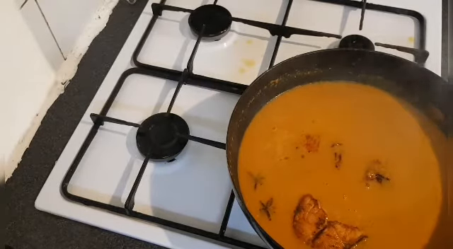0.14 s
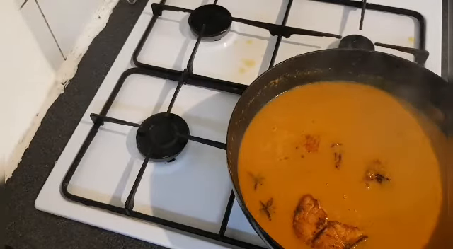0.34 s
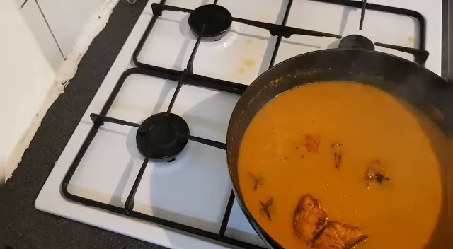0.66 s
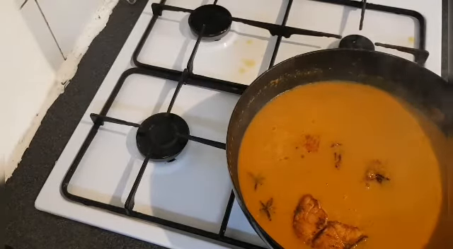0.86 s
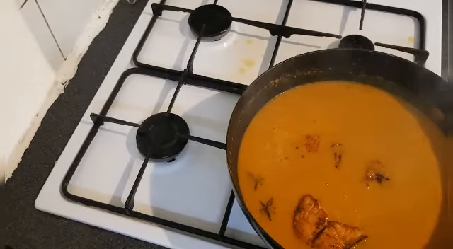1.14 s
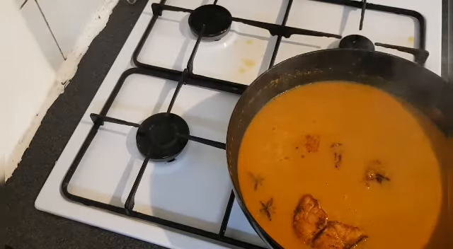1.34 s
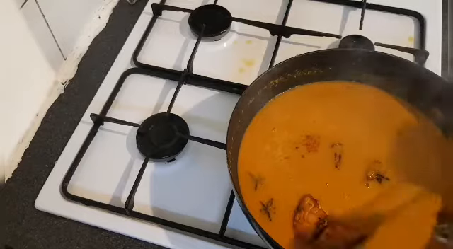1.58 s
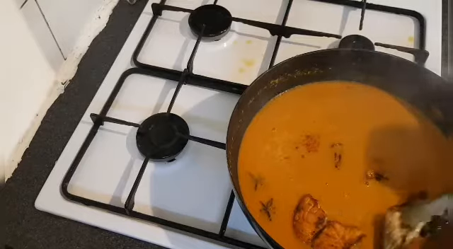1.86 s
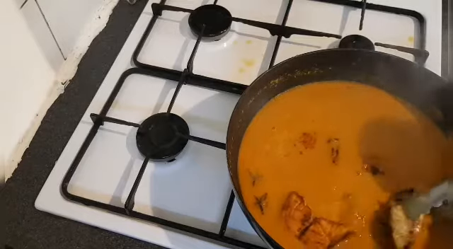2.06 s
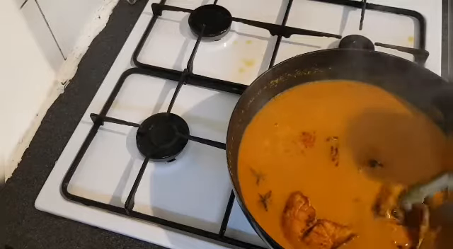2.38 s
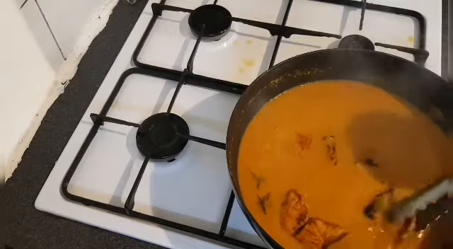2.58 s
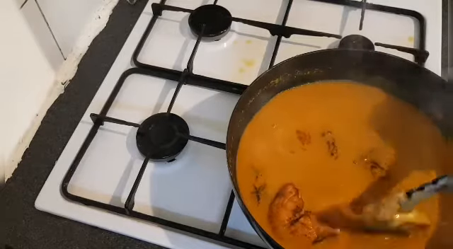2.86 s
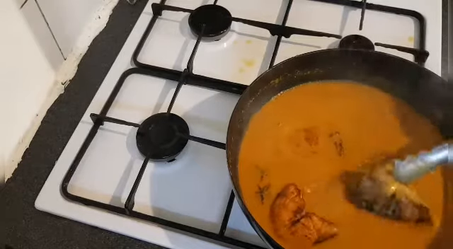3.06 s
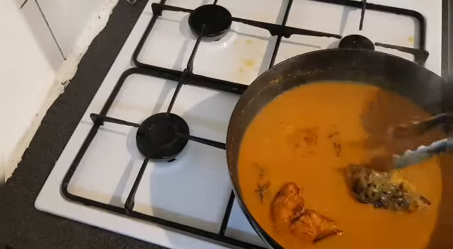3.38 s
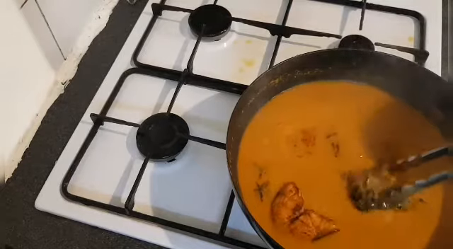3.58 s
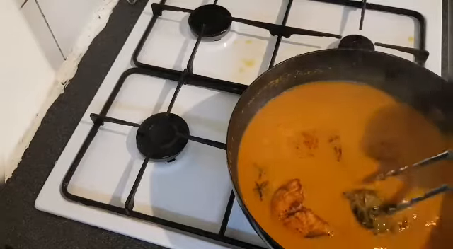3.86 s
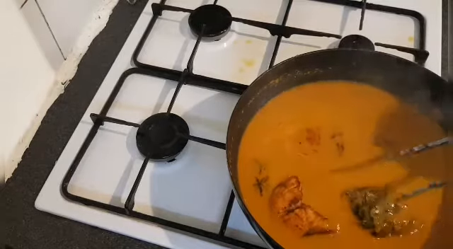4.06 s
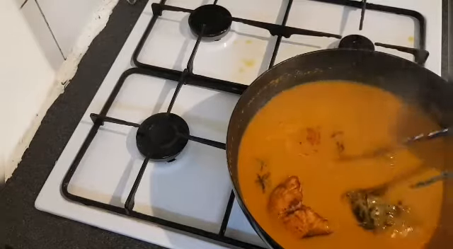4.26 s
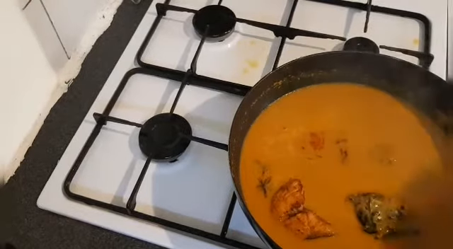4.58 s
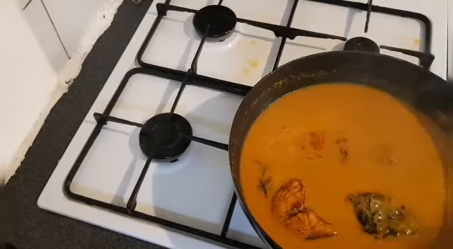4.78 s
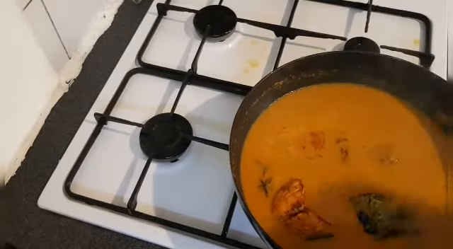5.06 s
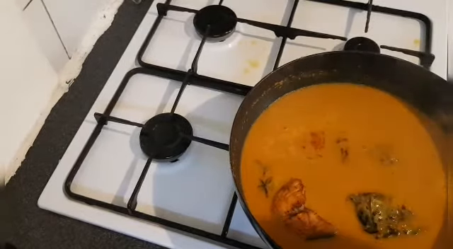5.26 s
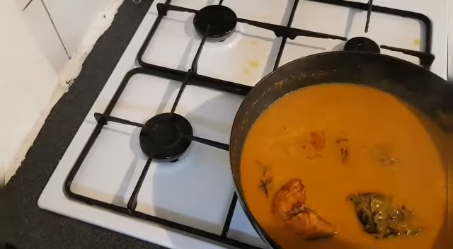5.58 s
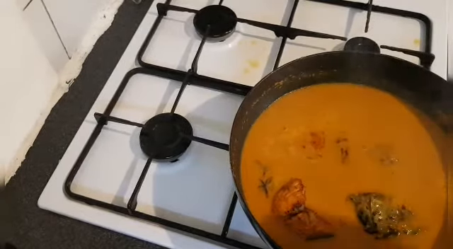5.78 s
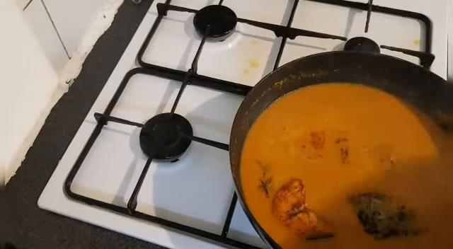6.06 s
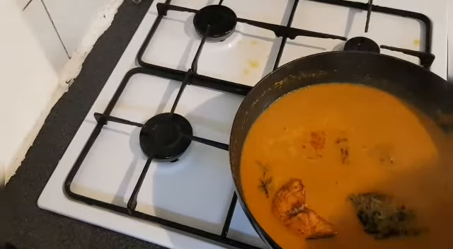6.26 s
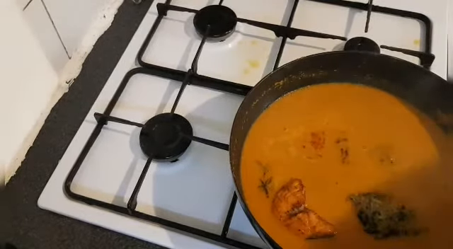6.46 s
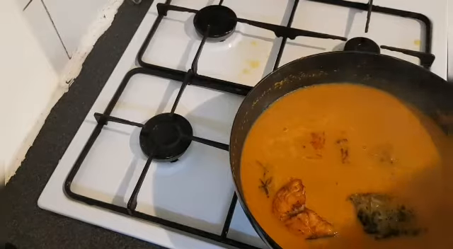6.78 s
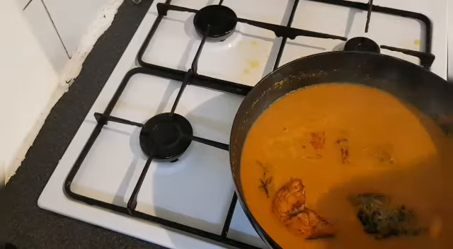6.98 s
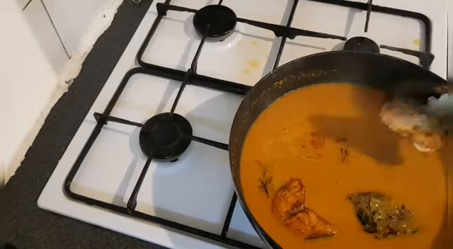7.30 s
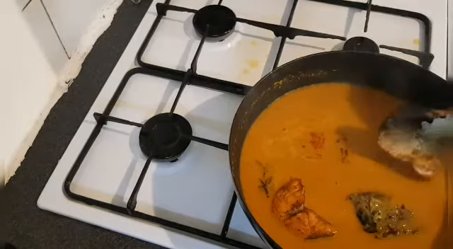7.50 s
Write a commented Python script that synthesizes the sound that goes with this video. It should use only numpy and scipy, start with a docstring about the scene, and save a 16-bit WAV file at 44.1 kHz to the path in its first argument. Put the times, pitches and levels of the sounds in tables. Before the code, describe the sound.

Steady flame rumble, gas hiss and faint electrical hum lie under sparse, crisp metal sounds. Thin tongs click and bounce, their arms knock a heavy sauce-damped pan, giving short dull rings and a low thump. Tiny bubbles spit and a few thick gulps blurt as sauce moves. Close microphones in a small kitchen catch a brief bright reflection after each contact.

```python
"""Tongs in a simmering curry pan.

Fish is turned with steel tongs in a pan of curry on a gas hob in a small kitchen. The burner rumbles and
hisses throughout (shaped noise) over a mains hum (sines). Tong tips tick and arms clack on the rim (noise
bursts with decaying modes), ringing the sauce-damped pan, which thumps on its grate. Thick sauce plops
and simmers (short rising sines with noise); a faint high rattle of the tongs is made the same way."""
import sys
import numpy as np
from scipy import signal
from scipy.fft import rfft, irfft, next_fast_len
from scipy.io import wavfile

SR = 44100
rng = np.random.default_rng(int(sys.argv[2]) if len(sys.argv) > 2 else 0)


def store_pcm(level_fs):
    """Save levels as 16-bit WAV."""
    pcm = np.round(np.clip(level_fs, -1, 1) * 32767).astype(np.int16)
    wavfile.write(sys.argv[1], SR, np.atleast_2d(pcm).T)


N = 336483
T = np.arange(int(0.7 * SR)) / SR  # time axis of every short sound, s


def undb(db):
    """Convert decibels to gain."""
    return 10 ** (np.asarray(db) / 20)


def pan(left_minus_right_db):
    """Gains of the two channels, the level difference split evenly between them."""
    return undb(np.array([[left_minus_right_db], [-left_minus_right_db]]) / 2)


def level(x, rms_db):
    """Set the rms level of a steady sound."""
    return x * undb(rms_db) / np.sqrt(np.mean(x ** 2))


def blow_level(x, db):
    """Set each channel's level of a short sound, as if its energy were spread over 10 ms."""
    rms = np.sqrt(np.sum(x ** 2, axis=-1, keepdims=True) / (SR / 100))
    return x * undb(db) / rms


def colour(points):
    """Gain as a function of frequency, interpolated in dB over log frequency."""
    hz, db = np.transpose(points)
    return lambda f: undb(np.interp(np.log(f), np.log(hz), db))


def decay(t60_s):
    """Exponential fall of 60 dB in t60_s."""
    return np.exp(-np.log(1000) * T / t60_s)


def noise(size, gain, apart_hz=1100):
    """Coloured noise at two microphone ports: alike in the bass, unrelated in the treble."""
    length = next_fast_len(size)
    f = np.fft.rfftfreq(length, 1 / SR) + 1
    mid, side = rfft(rng.standard_normal((2, length)))
    side = side * np.minimum(f / apart_hz, 1)
    ports = np.array([mid + side, mid - side])
    return irfft(ports * gain(f), length)[:, :size]


def walk(rate_hz):
    """Slow random wander with a spread near 1: random points joined by lines."""
    steps = np.arange(N) / SR * rate_hz
    return np.interp(steps, np.arange(1000), rng.standard_normal(1000))


def ring(modes, tilt_db_per_octave=0, apart_hz=1500):
    """Decaying modes, slightly detuned; the higher ones reach the two ports out of step."""
    out = 0
    for hz, db, t60_s in modes:
        spread = rng.uniform(-np.pi, np.pi) * min(hz / apart_hz, 1)
        phase = spread / 2 * np.array([[1], [-1]])
        detuned_hz = hz * (1 + 0.0037 * rng.standard_normal())
        gain = undb(db + tilt_db_per_octave * np.log2(hz))
        out = out + gain * decay(t60_s) * np.sin(2 * np.pi * detuned_hz * T + phase)
    return out


def crack(gain, rise_s, fall_s, chatter_db, chatter_s, room_db, t60_s, snap_hz=3500):
    """A brief bright noise burst, a slower chatter, then its wash from tiles and walls."""
    burst = noise(len(T), lambda f: gain(f) * f / np.hypot(f, snap_hz))
    burst = burst * (1 - np.exp(-T / rise_s)) * np.exp(-T / fall_s)
    chatter = noise(len(T), gain) * (1 - np.exp(-T / fall_s)) * np.exp(-T / chatter_s)
    wash = noise(len(T), gain) * (1 - np.exp(-T / chatter_s)) * decay(t60_s)
    return blow_level(burst, 0) + blow_level(chatter, chatter_db) + blow_level(wash, room_db)


def kitchen(x, wet_db, t60_s, onset_s=0.0015):
    """Direct sound plus dense reflections of hob, tiles and walls, drawn anew for each sound."""
    tail = noise(len(T), np.ones_like, apart_hz=320)
    tail = tail * decay(t60_s) * (1 - np.exp(-(T / onset_s) ** 2))
    tail = tail / np.sqrt(np.sum(tail ** 2, axis=1, keepdims=True))
    return x + undb(wet_db) * signal.fftconvolve(x, tail, axes=1)[:, :len(T)]


def add(out, start_s, x):
    """Mix a short sound in at start_s."""
    start = int(start_s * SR)
    out[:, start:start + len(T)] += x[:, :N - start]


def burner():
    """The flame flutters low down; the gas jet hisses and sounds the resonances of the burner tube."""
    # rumble of the flame, relative spectrum: hz, level_db
    flame_colour = [(20, -21), (45, -6), (70, -3.5), (105, 5), (135, -6), (205, -5.5), (245, -8.5),
                    (320, -4), (400, -13.5), (1000, -20.5), (2000, -33.5), (2800, -61), (16000, -92)]
    # hiss of the gas, relative spectrum: hz, level_db
    gas_colour = [(1000, -19), (2400, 0), (3100, -34), (4800, 9), (6500, 6), (7400, -2.5), (8600, 8),
                  (11000, 7), (13000, 8.5), (14500, 9.5), (16000, -9)]
    # jet and tube resonances, levels before flutter: centre_hz, nominal_width_hz, rms_db, left_minus_right_db
    burner_modes = [(1729, 338, -58, 0.5), (3912, 305, -67.5, 3.5), (5383, 260, -69, 5.5),
                    (6166, 340, -68, 4.5), (9430, 34, -79, 9.5), (9100, 1600, -70, 4),
                    (12100, 380, -64, 2.5)]
    flame = level(noise(N, colour(flame_colour), apart_hz=1110), -48.0)
    flame = flame * undb(1.25 * walk(10))
    gas = level(noise(N, colour(gas_colour)), -63.0)
    for hz, width_hz, db, pan_db in burner_modes:
        resonance = noise(N, lambda f: 1 / (1 + (1.64 * (f - hz) / width_hz) ** 2))
        gas = gas + level(resonance, db) * pan(pan_db)
    return flame + gas * undb(0.39 * walk(27))


def hum():
    """Mains hum: harmonics wavering a little in level and phase."""
    # hum lines, levels before wavering: hz, rms_db
    hum_lines = [(50, -54), (100, -55.5), (300, -60.5)]
    t = np.arange(N) / SR
    out = 0
    for hz, db in hum_lines:
        wavering = undb(db + 1.2 * walk(3))
        out = out + wavering * np.sin(2 * np.pi * hz * t + 0.25 * walk(4))
    return np.sqrt(2) * out  # rms to peak


def tip_contact(db, edge_hz, spot_hz, spot_db=9, spot_width_hz=450, body_db=-23):
    """One touch of the thin steel tips: bright above an edge, favouring one resonance."""
    # contact noise of the tips, relative spectrum: hz, level_db
    tick_colour = [(1800, 16.5), (3000, 0.5), (4500, 2.5), (7000, -10), (9600, 1.5), (11500, -0.5),
                   (13700, -24), (16000, 8)]
    # tip modes, relative levels: hz, level_db, t60_s
    tip_modes = [(4540, -1, 0.073), (5360, 4, 0.051), (7730, 1.5, .1), (8600, 2, 0.052), (9660, 0.5, 0.16),
                 (10400, -14, 0.068), (11000, -28, 0.059), (12500, 8, 0.1), (13700, 7, 0.09),
                 (15100, -16, 0.061)]

    def touch(f):
        return 1 / np.sqrt(1 + (edge_hz / f) ** 8) + undb(body_db) * f / (f + 1000)

    def spot(f):
        return 1 + (undb(spot_db) - 1) / (1 + (2 * (f - spot_hz) / spot_width_hz) ** 2)

    contact = crack(lambda f: colour(tick_colour)(f) * touch(f) * spot(f), rise_s=0.0011, fall_s=0.0011,
                    chatter_db=1.5, chatter_s=0.005, room_db=3.5, t60_s=0.33)
    excited = []
    for hz, mode_db, t60_s in tip_modes:
        drive_db = 20 * np.log10(touch(hz) * spot(hz)) + 4 * rng.standard_normal()
        excited.append((hz, mode_db + drive_db, t60_s))
    tips = kitchen(ring(excited), wet_db=0.5, t60_s=0.2)
    return blow_level(blow_level(contact, 0) + blow_level(tips, -9), db)


def tong_ticks():
    """The springy tips touch and rebound twice, the second rebound after a shorter gap and weaker."""
    # ticks: start_s, level_db, lower_edge_hz, strongest_resonance_hz, first_rebound_after_s,
    # first_rebound_relative_db, left_minus_right_db
    ticks = [(0.2673, -23, 8200, 9550, 0.0061, -4, 0), (1.7928, -27, 7800, 8500, 0.0047, -5, 1),
             (1.8535, -24.5, 6400, 13900, 0.0092, -6, 1), (3.047, -40, 7750, 8450, .006, 3.5, 0),
             (3.089, -29.5, 7960, 13000, 0.0026, 2.5, -3), (3.1046, -27.5, 3530, 4200, 0.0088, 0, 6),
             (4.7508, -28.5, 6900, 10800, 0.0087, -1.5, 0), (4.8302, -27.5, 5700, 13800, .009, -4.5, 2),
             (5.2374, -46, 4500, 9400, .022, -4, 0), (7.2675, -22, 5600, 14000, 0.011, -7, 3),
             (7.3205, -36.5, 5200, 8800, 0.0094, 2, 6)]
    gap_ratio, rebound_loss_db = 0.85, -10
    out = np.zeros((2, N))
    for start_s, db, edge_hz, spot_hz, gap_s, rebound_db, pan_db in ticks:
        touches = [(0, 0), (gap_s, rebound_db),
                   (gap_s * (1 + gap_ratio), rebound_db + rebound_loss_db)]
        for late_s, relative_db in touches:
            touch = tip_contact(db + relative_db, edge_hz, spot_hz)
            add(out, start_s + late_s, touch * pan(pan_db))
    return out


def rising_blip(hz, db, glide=0.046, splash_db=-11):
    """A brief decaying sine, rising in pitch like an air pocket in sauce, with a smack of noise."""
    t60_cycles = 14.7
    age = T * hz / t60_cycles
    envelope = np.exp(-np.log(1000) * age) * (1 - np.exp(-T * hz))
    pitch_hz = hz * (1 + glide * np.minimum(age, 1))
    tone = np.sin(2 * np.pi * np.cumsum(pitch_hz) / SR)
    smack = noise(len(T), lambda f: 1 / (f / hz + hz / f) ** 3)
    blip = blow_level(tone * envelope, 0) + blow_level(smack * envelope, splash_db)
    return blow_level(kitchen(blip, wet_db=4.0, t60_s=0.38), db)


def spit(bubble_db):
    """Fine spray as the skin of a bubble tears: a burst of band-limited noise."""
    low_hz, high_hz, relative_db = 3600, 11500, -0.5

    def spray(f):
        return 1 / np.sqrt((1 + (low_hz / f) ** 8) * (1 + (f / high_hz) ** 8))

    burst = crack(spray, rise_s=0.0016, fall_s=0.002, chatter_db=-4.5, chatter_s=0.0066,
                  room_db=2, t60_s=0.33)
    return blow_level(burst, bubble_db + relative_db)


def rattle_and_sauce(pockets_per_gulp=5):
    """A faint tong rattle, plops, and gulps: a spit, then ever larger air pockets of falling pitch."""
    # single plops, and first a faint high rattle of the tongs: start_s, pitch_hz, level_db
    rattle_and_plops = [(0.332, 3800, -49.5), (3.657, 740, -43.5), (6.4171, 1590, -45.5), (6.724, 200, -41),
                        (7.1029, 627, -47.5), (7.4363, 1540, -49)]
    # gulps: start_s, length_s, first_pitch_hz, last_pitch_hz, first_level_db, last_level_db
    gulps = [(4.271, 0.0048, 2140, 445, -48, -39), (6.186, .034, 1520, 240, -44.5, -43)]
    out = np.zeros((2, N))
    for start_s, hz, db in rattle_and_plops:
        add(out, start_s, rising_blip(hz, db))
    for start_s, length_s, first_hz, last_hz, first_db, last_db in gulps:
        add(out, start_s, spit(first_db))
        for part in np.linspace(0, 1, pockets_per_gulp):
            hz = first_hz * (last_hz / first_hz) ** part
            db = first_db + part * (last_db - first_db)
            add(out, start_s + part * length_s, rising_blip(hz, db))
    return out


def simmer():
    """Tiny bubbles of random size burst at random moments, each with a spit of spray."""
    bubbles_per_s, mid_db, spread_db = 2.5, -56.5, 7
    mid_hz, spread_octaves = 1180, 0.68
    out = np.zeros((2, N))
    for when, size, strength in rng.uniform(-1, 1, (int(bubbles_per_s * N / SR), 3)):
        db = mid_db + spread_db * strength
        hz = mid_hz * 2 ** (spread_octaves * size)
        add(out, abs(when) * N / SR, rising_blip(hz, db) + spit(db))
    return out


def spot_ring(hz, t60_s, db):
    """The spot under the tongs swells within a few cycles and is soon damped by the sauce."""
    swell = 1 - np.exp(-T * hz / 3)
    return blow_level(kitchen(ring([(hz, 0, t60_s)]) * swell, wet_db=-8, t60_s=0.36), db)


def pan_blows():
    """The arm clacks on the rim, the pan rings, and its weight rocks the grate a moment later."""
    # blows: start_s, clack_db, chatter_relative_db, pan_ring_db, ring_tilt_db_per_octave, grate_thump_db,
    # spot_hz, spot_db, spot_t60_s, second_spot_hz, second_spot_db, left_minus_right_db
    blows = [(2.099, -26.5, 3, -37.5, -2.5, -31.5, 1040, -36.5, 0.25, 763, -36, 2),
             (3.1186, -24, -0.5, -25.5, -7, -21.5, 1084, -23.5, 0.041, 2580, -37, 2),
             (4.273, -44.5, 2, -57, 3, -30, 170, -32, .07, 598, -43, 5),
             (5.5958, -19, 3, -27.5, 0, -55, 5100, -23.5, 0.013, 924, -37, 3)]
    # contact noise of the whole arm, relative spectrum: hz, level_db
    clack_colour = [(120, -26), (320, -3), (900, -1), (1300, -5), (2300, -1), (3500, -9), (5100, 2),
                    (5800, -8), (7200, -2), (9000, 3), (10500, 1), (11700, -6), (13500, -10), (16000, -12)]
    # pan modes, relative levels: hz, level_db, t60_s
    pan_modes = [(755, -8, .18), (788, -5, .2), (838, -6, .12), (935, -5, .09), (1006, -6, .2),
                 (1038, 0, .26), (1085, -3, .12), (1400, -9, .09), (1870, -5, .15), (2185, -2, .18),
                 (2498, -4, .18), (2929, -2, .2), (3844, -9, .25), (4690, -7, .2), (5060, -4, .22),
                 (6099, -10, .2), (7080, -8, .2), (8102, -3, .2), (8830, -2, .22), (9890, -4, .17),
                 (10910, -9, .2)]
    # full pan rocking on its grate, relative levels: hz, level_db, t60_s
    grate_modes = [(65.3, -20, 0.61), (112.2, -6, 0.34), (160, 1, 0.14), (185, -1, 0.16), (237, -8.5, 0.18),
                   (296, -14, 0.13)]
    second_t60_s = 0.058
    # thumps above neutral tilt the grate modes towards the bass, in dB per octave for each dB
    rock_neutral_db, rock_tilt_per_db = -26.5, -0.3
    out = np.zeros((2, N))
    for (start_s, clack_db, chatter_db, ring_db, tilt_db, thump_db,
         spot_hz, spot_db, spot_t60_s, second_hz, second_db, pan_db) in blows:
        contact = crack(colour(clack_colour), rise_s=0.0005, fall_s=0.0007,
                        chatter_db=chatter_db, chatter_s=0.01, room_db=0.2, t60_s=0.32)
        rim = kitchen(ring(pan_modes, tilt_db), wet_db=0.0, t60_s=0.37)
        spots = spot_ring(spot_hz, spot_t60_s, spot_db) + spot_ring(second_hz, second_t60_s, second_db)
        metal = blow_level(contact, clack_db) + blow_level(rim, ring_db) + spots
        rock_tilt_db = rock_tilt_per_db * max(thump_db - rock_neutral_db, 0)
        rocking = ring(grate_modes, rock_tilt_db, apart_hz=414)
        swell = 1 - np.exp(-(T / 0.017) ** 2)
        thump = kitchen(rocking * swell, wet_db=-6, t60_s=0.58)
        add(out, start_s, metal * pan(pan_db) + blow_level(thump, thump_db))
    return out


def scene():
    """Everything on the hob."""
    return burner() + hum() + tong_ticks() + rattle_and_sauce() + simmer() + pan_blows()


def record(dry, lag_s=0.0001, near_hz=700, top_hz=15750):
    """Two microphone ports colour the sound differently, bass reaches the left later, the top is cut."""
    # difference between the ports: hz, left_minus_right_db
    port_balance = [(60, 2), (150, 3), (300, -.5), (1100, 2), (1800, -4.5), (3000, -6.5), (5200, -7),
                    (7300, -7), (9400, 6.5), (11000, 2), (12500, -3.5), (16000, -2)]
    f = np.fft.rfftfreq(N, 1 / SR) + 1
    balance = np.sqrt(colour(port_balance)(f))
    late = np.exp(-2j * np.pi * f * lag_s / (1 + (f / near_hz) ** 2))
    ports = irfft(rfft(dry) * np.array([balance * late, 1 / balance]), N)
    top_cut = signal.ellip(10, 0.2, 70, top_hz, fs=SR, output="sos")
    return signal.sosfilt(top_cut, ports)


dry = scene()
out = record(dry)
store_pcm(out)
```